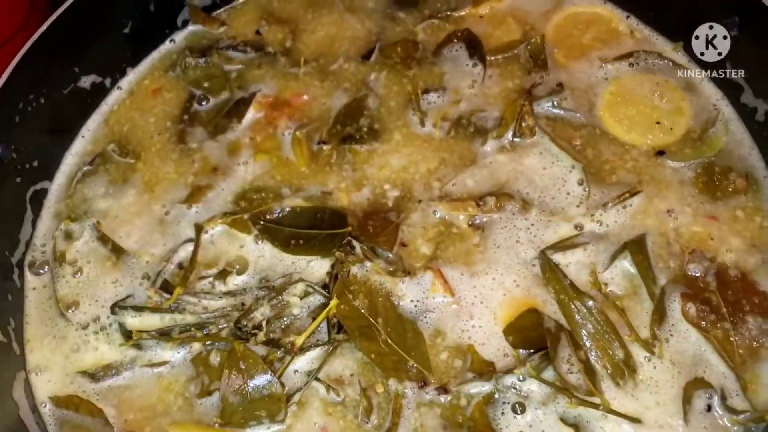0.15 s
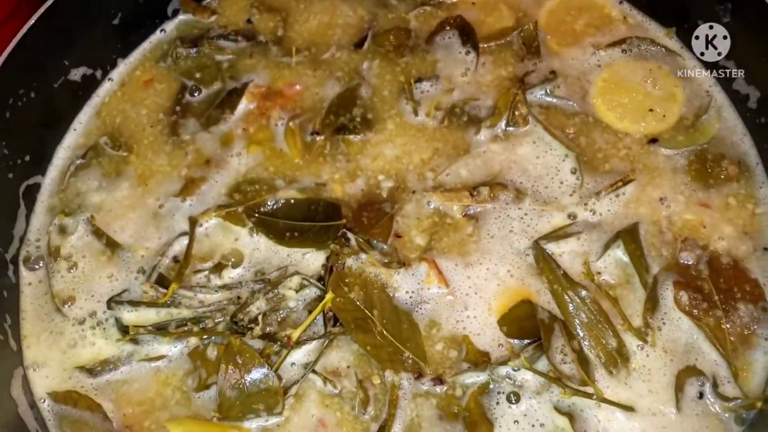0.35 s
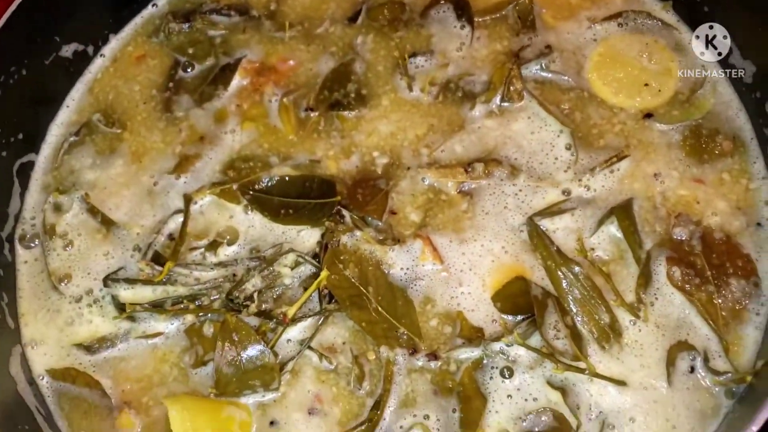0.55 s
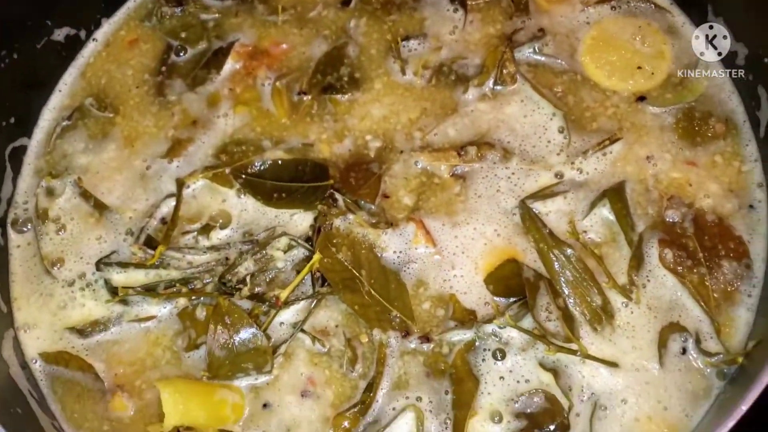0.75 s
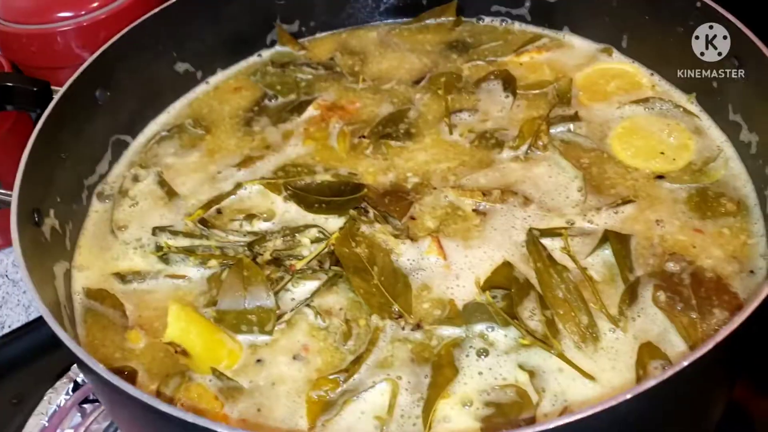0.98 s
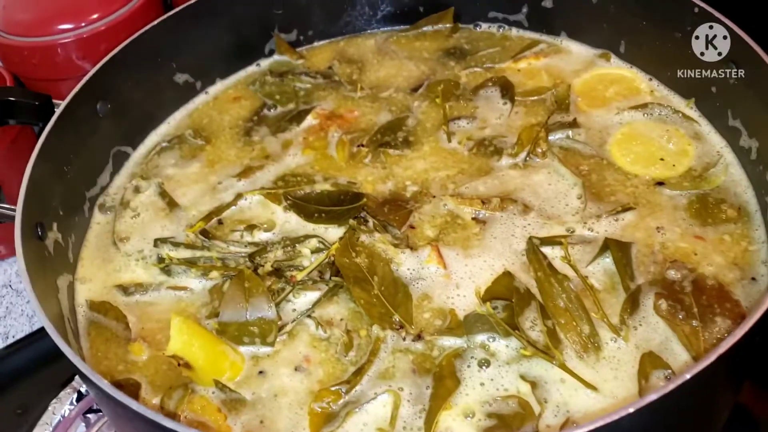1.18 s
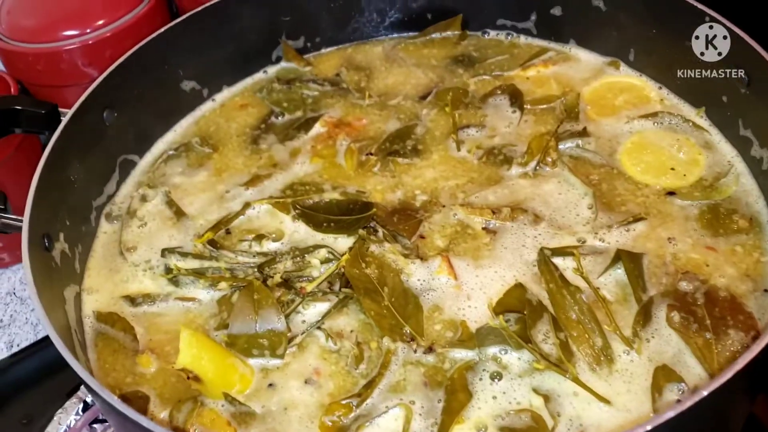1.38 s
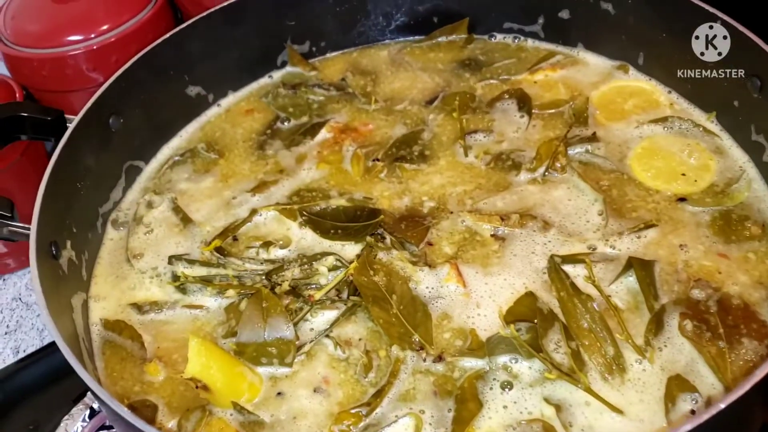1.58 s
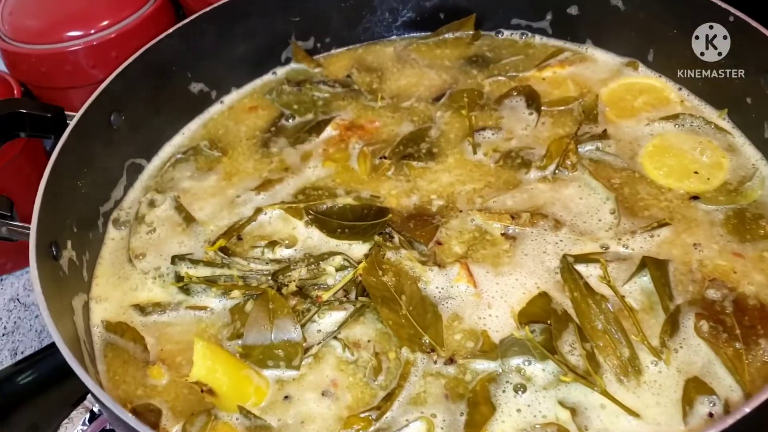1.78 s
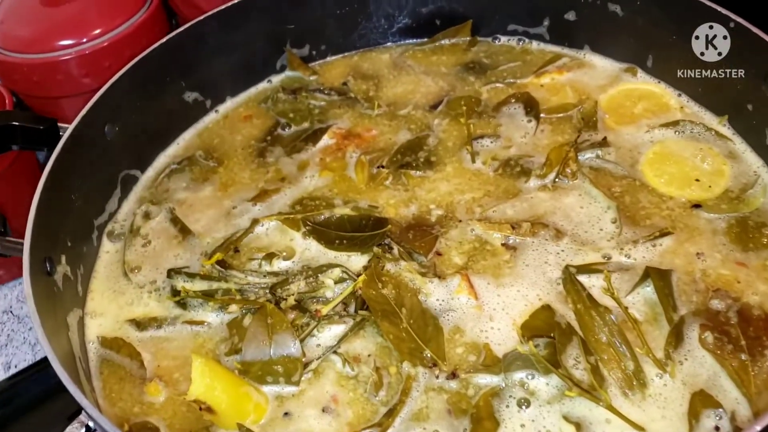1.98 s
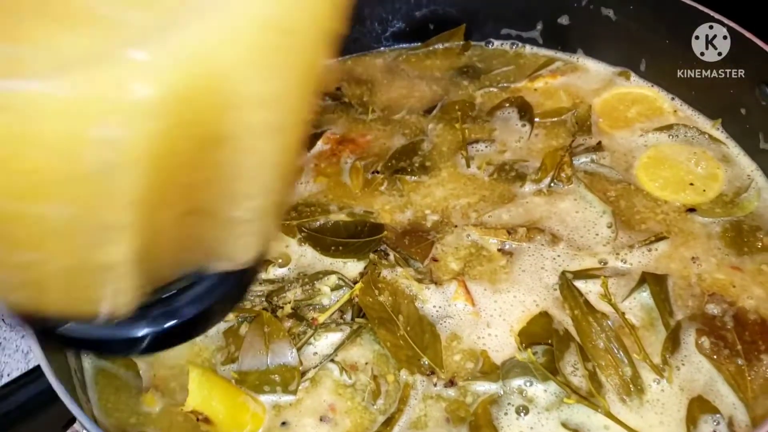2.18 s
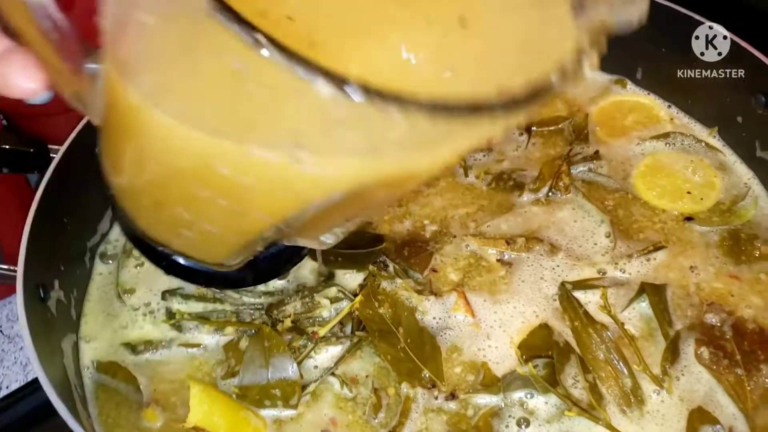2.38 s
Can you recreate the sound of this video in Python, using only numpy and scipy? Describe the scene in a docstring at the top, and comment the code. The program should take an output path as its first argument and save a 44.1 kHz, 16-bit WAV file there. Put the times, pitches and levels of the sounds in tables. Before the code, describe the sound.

Two sharp knocks on a metal cooking pot, followed by soft simmering and tiny splashes.

```python
"""A metal pot takes two knocks from a hard utensil, which then rattles out, in a small kitchen.
Each blow rings the pot's modes under a crack of noise, and the room adds a short tail.
Small clinks and splashes, each a puff of noise with a brief ring, dot the whole scene.
Underneath lie a low rumble, the hiss of the simmer and an appliance hum; all three step up late on."""
import sys
import numpy as np
from scipy import signal
from scipy.fft import rfft, irfft, next_fast_len
from scipy.io import wavfile

SR = 44100
rng = np.random.default_rng(int(sys.argv[2]) if len(sys.argv) > 2 else 0)


def generate_wav(signal):
    """Clip the signal to [-1, 1] and save it as 16-bit WAV at the path in sys.argv[1]."""
    frames = np.transpose(np.atleast_2d(signal))
    scaled = np.clip(frames, -1, 1) * 32767
    pcm = np.round(scaled).astype(np.int16)
    wavfile.write(sys.argv[1], SR, pcm)


N = 108045


def from_db(db):
    """Gain of a level in dB."""
    return 10 ** (np.asarray(db) / 20)


def rms_one(x):
    """Scale to rms 1."""
    return x / np.sqrt(np.mean(x ** 2) + 1e-20)


def at_hz(curve, hz):
    """Read a curve on a log frequency axis."""
    curve_hz, values = np.transpose(curve)
    return np.interp(np.log(np.maximum(hz, 1)), np.log(curve_hz), values)


def filtered(x, order, hz, kind):
    """Butterworth filter."""
    return signal.sosfilt(signal.butter(order, hz, kind, fs=SR, output="sos"), x)


def coloured(noise, spectrum):
    """Noise shaped by an EQ curve; rms 1."""
    size = noise.shape[-1]
    hz = np.arange(size // 2 + 1) * SR / size
    return rms_one(irfft(rfft(noise) * from_db(at_hz(spectrum, hz)), size))


def drift(rate_hz):
    """Smooth random modulation with a spread of 1."""
    hop, run_in = 40, 2000
    pole = np.exp(-2 * np.pi * hop * rate_hz / SR)
    noise = rng.standard_normal(N // hop + run_in + 2)
    slow = signal.lfilter([1], [1, -2 * pole, pole * pole], noise)[run_in:]
    return np.interp(np.arange(N) / hop, np.arange(len(slow)), rms_one(slow))


# Stereo image, narrow lows and wide highs: frequency_hz, left_right_correlation
STEREO_LIKENESS = [(40, 0.87), (120, 1), (250, 0.54), (550, 0.36), (1650, 0.0075), (15000, 0.01)]
# The low mids lean left: frequency_hz, left_over_right_db
STEREO_LEAN = [(60, 0.5), (180, 3), (550, 4), (1650, 0)]


def wide_noise(spectrum):
    """Stereo noise whose width and balance change with frequency; rms 1."""
    size = next_fast_len(N)
    hz = np.arange(size // 2 + 1) * SR / size
    mid, side = rfft(rng.standard_normal((2, size)))
    alike = np.clip(at_hz(STEREO_LIKENESS, hz), 0, 1)
    pair = np.sqrt(1 + alike) * mid + np.sqrt(1 - alike) * side * [[1], [-1]]
    pair *= from_db(at_hz(spectrum, hz) + at_hz(STEREO_LEAN, hz) * [[.5], [-.5]])
    return rms_one(irfft(pair, size)[:, :N])


# Fader moves of the background bed: time_s, rumble_db, hiss_db, hum_db
BED_FADERS = [(0, -46.5, -52, -55), (.25, -38.5, -51.5, -52.5), (0.499, -49.5, -53, -61.5),
              (0.899, -50, -56.5, -65.5), (1.591, -52, -58.5, -62), (1.63, -46, -51.5, -50),
              (2.0, -46, -51.5, -52), (2.201, -43, -51.5, -51.5), (2.45, -42, -54, -50)]
# EQ of the rumble: frequency_hz, gain_db
RUMBLE_EQ = [(15, -37.5), (25, -12.5), (48, 0.5), (70, -1), (120, -6.5), (180, -15), (250, -20), (400, -49)]
# EQ of the simmer: frequency_hz, gain_db
SIMMER_EQ = [(120, -22.5), (200, -4), (400, -2), (560, -8), (650, -2.5), (730, -8.5), (820, -9.5),
             (970, -16), (1500, -14), (4770, -22.5), (7400, -32), (8600, -44.5), (9800, -34.5),
             (13000, -32), (15300, -29), (16000, -54)]
# Partials of the appliance hum: pitch_hz, level_db
HUM_PARTIALS = [(59, -4.5), (118.4, -4.5), (177, -9.5), (296.1, -4.5), (393, -7.5), (473.7, -11.5),
                (592.2, -14.5), (834.4, -12.5)]


def rumble_simmer_and_hum():
    """The bed: deep noise, a gently flickering simmer hiss and slightly unsteady hum partials."""
    t = np.arange(N) / SR
    time_s, *faders = np.transpose(BED_FADERS)
    rumble_gain, hiss_gain, hum_gain = (from_db(np.interp(t, time_s, db)) for db in faders)
    hum = np.zeros(N)
    for pitch_hz, level_db in HUM_PARTIALS:
        amplitude = np.sqrt(2) * from_db(level_db + 1.8 * drift(1.7))
        turns = pitch_hz * t + rng.random() + 0.05 * drift(6.3)
        hum += amplitude * np.sin(2 * np.pi * turns)
    rumble = wide_noise(RUMBLE_EQ)
    hiss = from_db(0.53 * drift(7.5)) * wide_noise(SIMMER_EQ)
    return rumble_gain * rumble + hiss_gain * hiss + hum_gain * hum


def splash_resonances(noise, t, depth_db=15, spacing_hz=220, fade_s=0.04):
    """Colour the onset with random small resonances that fade back to plain noise."""
    hz = np.arange(len(t) // 2 + 1) * SR / len(t)
    peaks = from_db(depth_db * np.interp(hz / spacing_hz, np.arange(400), rng.random(400)))
    resonant = irfft(rfft(noise) * rms_one(peaks), len(t))
    share = np.exp(-t / fade_s)
    return share * resonant + (1 - share) * noise


# Cues for clinks and splashes; ring, body and treble are trims on the level:
# start_s, level_db, ring_hz, ring_db, ring_t60_s, body_db, treble_db, rise_s, puff_t60_s
SPLASH_CUES = [(0.127, -48.5, 1475, -5, 0.091, -3.5, 7.5, 0.00068, 0.19),
               (.587, -41, 1620, -13, 0.065, 4.5, -11, 0.0008, 0.19),
               (0.639, -61, 1740, 11, 0.12, 17.5, 8, 0.0031, 0.11),
               (0.687, -45.5, 1473, -4, 0.056, 2, -7, 0.0031, 0.32),
               (.735, -57, 2380, 2, .06, 5.5, -23, .004, 0.29),
               (.7776, -45, 3430, -4, .07, -26, 1, 0.00065, 0.11),
               (.783, -51.5, 2670, 0.5, 0.12, 2, -18, 0.0015, 0.42),
               (0.824, -54.5, 2720, 0, 0.057, 4.5, -19, 0.0033, 0.22),
               (.925, -66.5, 2300, -2, .05, 12, 7.5, 0.0034, 0.2),
               (.97, -53, 2300, -12, 0.053, -4, 4, .003, 0.088),
               (1.055, -44, 3200, -6.5, 0.064, -5.5, -9.5, .001, 0.23),
               (1.059, -57, 2280, 5.5, 0.079, -6.5, 14, 0.02, 0.13),
               (1.125, -54.5, 2220, -10, 0.049, 2.5, -22, 0.0034, 0.2),
               (1.2878, -51.5, 2270, -11, .05, 6, -7.5, 0.0014, 0.32),
               (1.3887, -46.5, 2780, -9, .05, -2, -6.5, 0.0073, 0.48),
               (1.5324, -52, 5430, 1, 0.0071, -11.5, -1, 0.00057, 0.033),
               (1.5635, -56.5, 398, 25.5, 0.033, 6.5, -3, 0.00092, 0.085),
               (1.592, -54, 4270, -6, .04, -8, 1.5, .003, 0.23),
               (1.6135, -40, 1675, -7, 0.11, -6, -5, 0.00077, 0.57),
               (1.661, -45.5, 1250, -17, 0.027, -5, 1, 0.013, 0.24),
               (1.6885, -34.5, 800, -11, 0.062, 4.5, -10, 0.00057, 0.1),
               (1.69, -61.5, 114, 24, 0.14, -2, 0, .003, 0.092),
               (1.698, -42.5, 1220, 6, 0.057, 12, -16, 0.0022, 0.09),
               (1.718, -50, 447, 10, 0.078, 11.5, -10, 0.0028, 0.31),
               (1.8745, -48.5, 5900, -6, 0.044, -6, 4.5, 0.0029, 0.47),
               (1.889, -58.5, 6220, 8, 0.11, -4, -12, .004, .1),
               (1.985, -48.5, 1500, -13, .05, -1, -5, 0.0083, 0.31),
               (2.13, -52.5, 2980, -18, 0.036, -17, 3, 0.012, 1),
               (2.181, -43.5, 1091, -6, 0.42, 0, -3.5, 0.003, 0.38),
               (2.341, -45.5, 6850, -7.5, 0.066, -13, 3.5, 0.0023, 0.21)]
# EQ of the splash noise: frequency_hz, gain_db
SPLASH_EQ = [(250, -14), (700, -1.5), (1500, -5), (3000, 0), (6000, -8), (7600, -10), (8600, -17),
             (9800, -10), (12000, -7.5), (15300, -8.5), (16000, -37)]


def clinks_and_splashes(body_to_hz=2000, treble_from_hz=5300, grain_db=0.73):
    """Each is a grainy, resonant puff of noise that dies away, with one short ring at its start."""
    out = np.zeros((2, N))
    noise = wide_noise(SPLASH_EQ) * from_db(-grain_db * drift(60))
    body = filtered(noise, 3, body_to_hz, "low")
    middle = filtered(noise, 3, [body_to_hz, treble_from_hz], "band")
    treble = filtered(noise, 3, treble_from_hz, "high")
    ring_flutter = from_db(5.2 * drift(91))
    waver_turns = 0.13 * drift(32.8)
    for (start_s, level_db, ring_hz, ring_db, ring_t60_s,
         body_db, treble_db, rise_s, puff_t60_s) in SPLASH_CUES:
        start = int(start_s * SR)
        span = slice(start, min(start + SR // 2, N))
        t = np.arange(span.stop - start) / SR
        envelope = (1 - np.exp(-t / rise_s)) * from_db(-60 * t / puff_t60_s)
        bands = from_db(body_db) * body[:, span] + middle[:, span] + from_db(treble_db) * treble[:, span]
        puff = splash_resonances(bands, t) * envelope
        turns = ring_hz * t + waver_turns[span] - waver_turns[start]
        ring = ring_flutter[span] * np.sin(2 * np.pi * turns) * from_db(ring_db - 60 * t / ring_t60_s)
        out[:, span] += from_db(level_db) * (puff + ring)
    return out


# Ringing modes of the pot: pitch_hz, level_db, t60_s
POT_MODES = [(76, -17.5, 0.085), (174.5, -15, 0.27), (575, -9.5, 0.03), (634.5, 0, 0.035),
             (731, -11.5, 0.031), (1015, -17, .05), (1296, -5.5, 0.035), (1399, -10, .05),
             (1560, -1, 0.066), (1605, 0, 0.052), (1760, -2.5, 0.045), (1995, -5, 0.049),
             (2110, -5.5, 0.055), (2295, -0.5, 0.066), (2443, -5, 0.075), (2564, 2, 0.081),
             (2612, -1, .065), (2748, 4.5, 0.032), (2945, -8, 0.041), (3154, -6, 0.065),
             (3633, -4.5, 0.049), (4560, -8.5, .03), (5480, -7.5, 0.03), (6000, -12.5, 0.022)]


def pot_ring(t, thud_db, wall_db, rim_db, scatter_db=1.5, detune=0.003):
    """The struck pot rings as dying sines, their strengths and pitches a little different each blow."""
    pitch_hz, level_db, t60_s = np.transpose(POT_MODES)[:, :, None]
    thud, rim = pitch_hz < 1100, pitch_hz > 3300
    lower_wall = ~thud & (pitch_hz < 2200)
    phases = rng.random((2, *pitch_hz.shape)) * ~thud  # the thud is alike in both ears
    level_db = level_db + np.select([thud, lower_wall, rim], [thud_db, wall_db, rim_db])
    level_db += scatter_db * rng.standard_normal(pitch_hz.shape)
    detuned_hz = pitch_hz * (1 + detune * rng.standard_normal(pitch_hz.shape))
    envelopes = from_db(level_db - 60 * t / t60_s)
    return np.sum(envelopes * np.sin(2 * np.pi * (detuned_hz * t + phases)), axis=1)


# Utensil hits on the pot; thud, lower wall, rim and crack are trims on the level:
# start_s, level_db, thud_db, wall_db, rim_db, crack_db, left_over_right_db
UTENSIL_HITS = [(0.2118, -13.5, 0.5, -18.5, -15.5, -5, 3), (0.2147, -18, -10, -10, -8, -0.5, -1),
                (0.2271, -22.5, -8, -11.5, -7, 0.5, -2.5), (.288, -26, -7.5, -2, -4, -6, -3),
                (0.3118, -30, -10.5, 2.5, 0, 17, -2), (0.3138, -11.5, -7.5, 4, 0, 0.5, 1.5),
                (0.3174, -16.5, -18, -2.5, -3, 1, -4), (0.3301, -15, -17.5, -6.5, 1, -2.5, -6),
                (0.347, -23.5, -6.5, -1, 3, 4.5, 2.5), (0.377, -29, -9, 3, -12, 3, 0.5),
                (.391, -29.5, 1, 8.5, 10, -2, 1.5), (.401, -25.5, -4.5, 2.5, -4, 1, -1.5),
                (.424, -38.5, 0, 5.5, 4, 1, -6)]
# EQ of the contact crack: frequency_hz, gain_db
CRACK_EQ = [(500, -38), (900, -21), (1500, -7), (2600, -12), (4000, -7), (6000, -12), (8500, -20),
            (12900, -15.5), (16000, -27)]


def utensil_blows(contact_s=0.00056, crack_decay_s=0.0074):
    """Each hard contact sets the pot ringing, with a bright crack of noise on top."""
    out = np.zeros((2, N))
    t = np.arange(SR // 4) / SR
    attack = 1 - np.exp(-t / contact_s)
    noise = rng.standard_normal((len(UTENSIL_HITS), 2, len(t)))
    cracks = coloured(noise, CRACK_EQ) * np.exp(-t / crack_decay_s)
    for hit, crack in zip(UTENSIL_HITS, cracks):
        start_s, level_db, thud_db, wall_db, rim_db, crack_db, left_over_right_db = hit
        blow = from_db(crack_db) * crack + pot_ring(t, thud_db, wall_db, rim_db)
        ear_gains = from_db(level_db + left_over_right_db * np.array([[.5], [-.5]]))
        start = int(start_s * SR)
        out[:, start:start + len(t)] += ear_gains * blow * attack
    return out


def kitchen_reverb(x, send_db=-6.5, mid_t60_s=0.36, treble_t60_s=0.28, first_echo_s=0.0045):
    """Dense small-room reflections: a noise tail for each ear, the treble dying sooner."""
    t = np.arange(int(0.7 * SR)) / SR
    mid, treble = rng.standard_normal((2, 2, len(t)))
    mid = filtered(mid, 2, [250, 4000], "band") * from_db(-60 * t / mid_t60_s)
    treble = filtered(treble, 2, 4000, "high") * from_db(0.5 - 60 * t / treble_t60_s)
    tail = (mid + treble) * (t > first_echo_s) * np.sqrt(60 / SR)
    return from_db(send_db) * signal.fftconvolve(x, tail, axes=1)[:, :N]


def scene():
    """The pot and its room tail, over dry clinks, splashes and the bed."""
    pot = utensil_blows()
    return pot + kitchen_reverb(pot) + clinks_and_splashes() + rumble_simmer_and_hum()


def record(dry):
    """Overloading peaks clip hard, then a steep low-pass cuts the very top."""
    ceiling, cutoff_hz = 0.94, 16600
    low_pass = signal.cheby2(16, 70, cutoff_hz, fs=SR, output="sos")
    return signal.sosfilt(low_pass, np.clip(dry, -ceiling, ceiling))


dry = scene()
out = record(dry)
generate_wav(out)
```